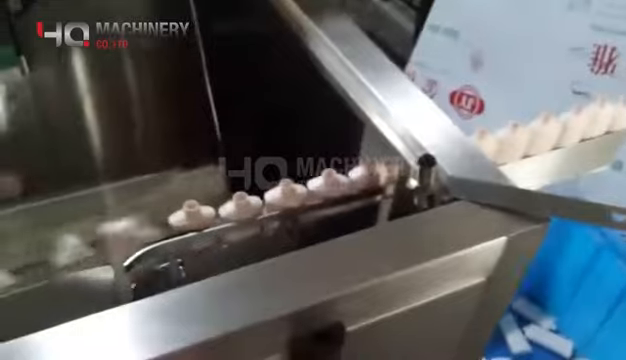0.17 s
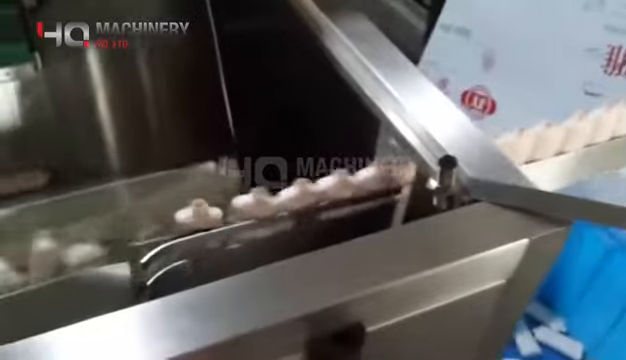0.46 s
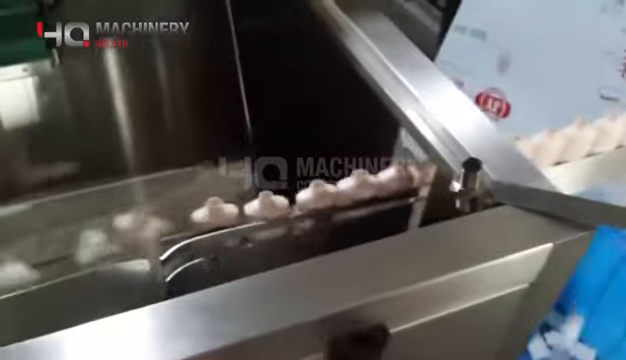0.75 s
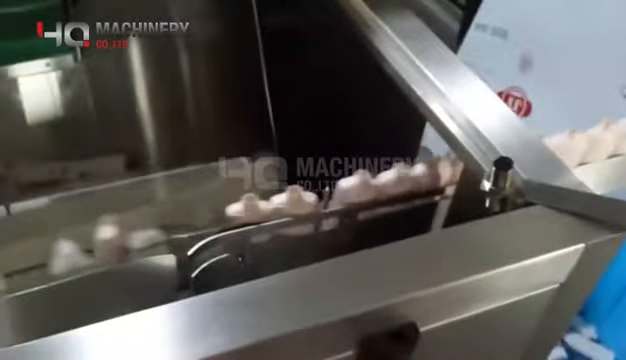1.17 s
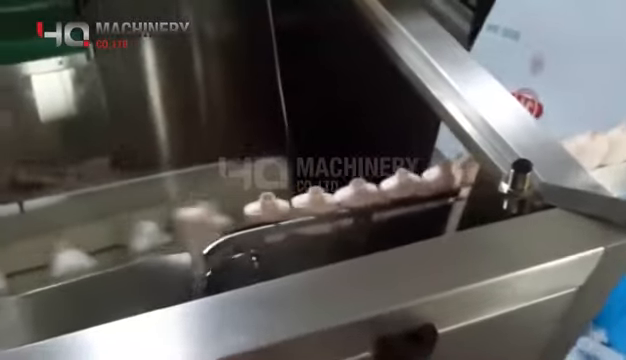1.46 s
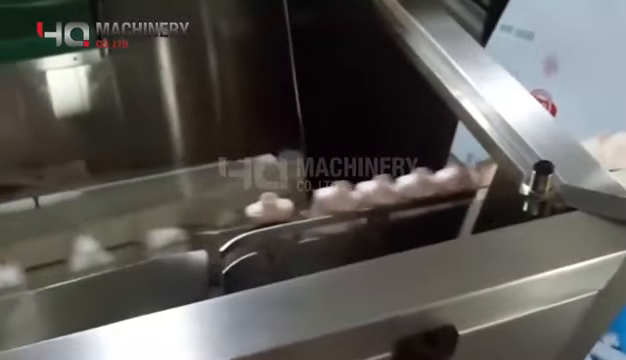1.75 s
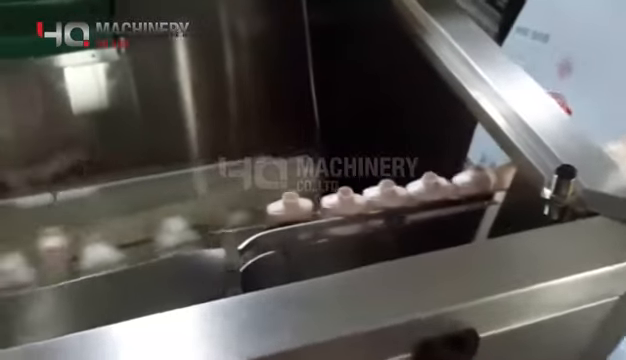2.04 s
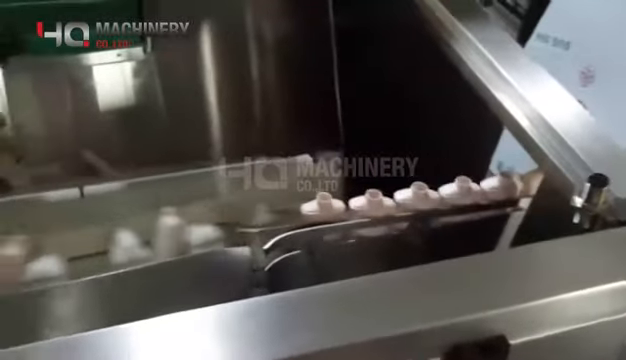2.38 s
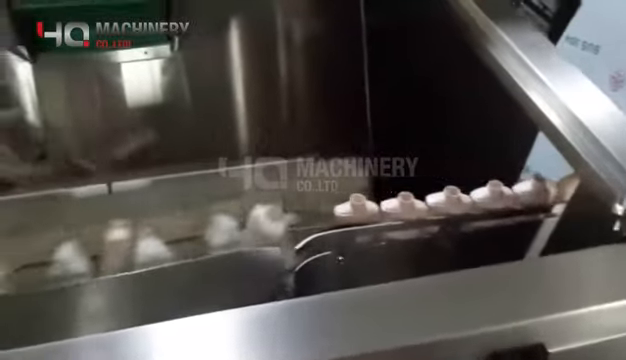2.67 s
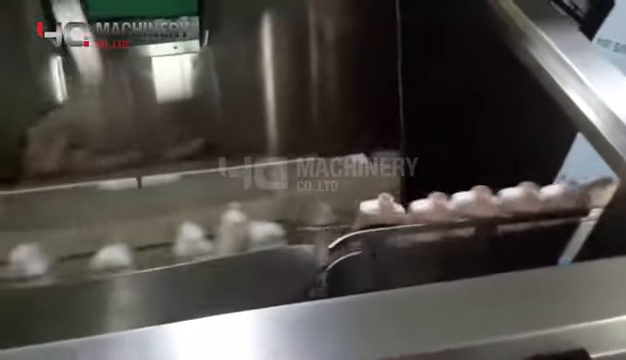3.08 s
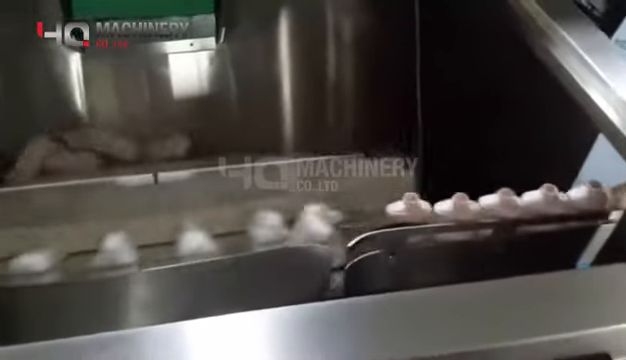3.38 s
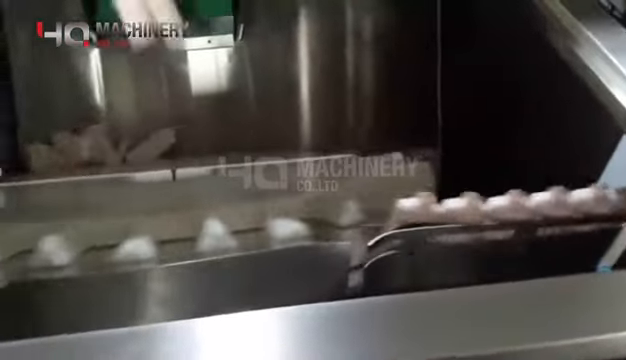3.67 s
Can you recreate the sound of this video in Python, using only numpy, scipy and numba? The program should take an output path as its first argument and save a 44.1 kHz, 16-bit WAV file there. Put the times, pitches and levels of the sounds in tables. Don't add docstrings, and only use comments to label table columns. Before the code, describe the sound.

Plastic bottles tumble and knock in a running steel sorting machine, with a constant fluttering air hiss and low rumble; the clatter grows busier in the second half. Close phone microphone in a factory hall, thin bass, dull top.

```python
import sys
import numpy as np
from scipy import signal
from scipy.fft import rfft, irfft, next_fast_len
from scipy.io import wavfile
from scipy.ndimage import uniform_filter1d
from numba import njit

SR = 44100
rng = np.random.default_rng(int(sys.argv[2]) if len(sys.argv) > 2 else 0)


def inscribe(sig):
    pcm = np.round(np.clip(np.atleast_2d(sig).T, -1, 1) * 32767)
    wavfile.write(sys.argv[1], SR, pcm.astype(np.int16))


def volts_from_decibels(level):
    exponent = np.asarray(level, float) / 20
    return 10 ** exponent


N = 168462


def level(x, db):
    return x * volts_from_decibels(db) / np.sqrt(np.mean(x ** 2))


def colour_db(table, hz):
    rows = np.array(table, float)
    return np.interp(np.log(np.maximum(hz, 1)), np.log(rows[:, 0]), rows[:, 1])


def curve_db(table):
    return np.interp(np.arange(N) / SR, *np.array(table, float).T)


def band(x, hz, width_hz):
    return signal.lfilter(*signal.iirpeak(hz, hz / width_hz, fs=SR), x)


def walk(rate_hz):
    k = int(SR / rate_hz)
    held = rng.standard_normal(400)[np.arange(N) // k % 400]
    return 1.3 * uniform_filter1d(uniform_filter1d(held, k), k)


def shaped(table, flicker_db, rate_hz, step_oct):
    size = next_fast_len(N)
    hz = np.fft.rfftfreq(size, 1 / SR)
    noise = rfft(rng.standard_normal(size)) * volts_from_decibels(colour_db(table, hz)) * (hz > table[0][0] / 2)
    out = 0
    for centre in np.arange(np.log2(table[0][0]) - 1, np.log2(table[-1][0]) + step_oct, step_oct):
        part = np.clip(1 - abs(np.log2(hz + 1) - centre) / step_oct, 0, 1)
        out = out + irfft(noise * part, size)[:N] * volts_from_decibels(flicker_db * walk(rate_hz))
    return level(out, 0)


@njit
def rings(n, at_s, hz, t60_s, size):
    out = np.zeros(n)
    for e in range(len(at_s)):
        turn = np.exp(2j * np.pi * hz[e] / SR - np.log(1000) / (t60_s[e] * SR))
        z, i = size[e] + 0j, int(at_s[e] * SR)
        for j in range(max(i, 0), min(n, i + int(t60_s[e] * SR))):
            out[j] += z.imag
            z *= turn
    return out


def bursts(t, table, rise_s, fall_s):
    env = 0
    for start, db in table:
        rise = np.clip((t - start) / rise_s, 0, 1)
        env = env + volts_from_decibels(db) * rise * np.exp(-np.maximum(t - start - rise_s, 0) / fall_s)
    return env


def chatter(t, table, low_hz, high_hz, t60_s):
    taps_per_s, rise_s, fade_s = 500, 0.0037, .016
    env = 0
    for start, length, db in table:
        rise = np.clip((t - start) / rise_s, 0, 1)
        env = env + volts_from_decibels(db) * rise * np.exp(-np.maximum(t - start - length, 0) / fade_s)
    when, pitch, strength, decay = rng.random((int(taps_per_s * N / SR), 4)).T
    hz = low_hz * (high_hz / low_hz) ** pitch
    taps = rings(N, when * N / SR, hz, t60_s * (0.29 + decay), volts_from_decibels(-1.8 * np.log(strength)))
    return env * level(taps, 0), env


def drops(table, t60_s, gain_db, spread):
    t, db, hz = np.array(table).T[:, :, None]
    g = rng.standard_normal((len(t), 3)) * np.array([0, 1, 1])
    one = np.ones_like(g)
    at_s = t + 0.00824 * abs(g)
    pitch_hz = hz * np.exp(spread * g)
    return rings(N, at_s.ravel(), pitch_hz.ravel(), t60_s * one.ravel(), (volts_from_decibels(db + gain_db) * one).ravel())


# Hz, level in dB.
JET = [(1470, -7.5), (2500, -7.5), (3630, -10), (5970, 1), (6350, 3), (6690, -2), (7280, -8.5),
       (7600, -22.5)]
# centre in seconds, half width in seconds, swell in dB.
PUFFS = [(.035, 0.028, 5), (.2, 0.012, 3), (.28, 0.11, 1.5), (.72, 0.024, 2), (.93, .02, 1.5),
         (1.034, 0.033, 4), (1.541, 0.0066, 6.5), (1.66, 0.081, 4), (1.95, 0.016, 4), (2.2, .012, -1),
         (2.33, 0.035, 4.5), (2.786, 0.0061, 4.5), (3.03, 0.12, 3), (3.24, 0.042, 2.5), (3.47, 0.016, 3.5),
         (3.71, 0.07, 3.5)]
# time in seconds, level in dB.
SPRAY = [(0, 0.5), (.25, -1), (.45, -3), (.68, -3.5), (.9, 1), (1.3, -0.5), (1.9, -0.5), (2.2, 0.5),
         (2.45, 1.5), (2.75, -0.5), (3.0, 1), (3.3, -1), (3.5, 2.5), (3.82, 2)]


def jet(t):
    jet_db, flutter_db, bands_db = -19, .6, 2.2
    swell_db = sum(db * np.exp(-((t - centre) / width) ** 2) for centre, width, db in PUFFS)
    air = shaped(JET, bands_db, 22.11, step_oct=.15)
    spray = band(air, 3600, width_hz=2600)
    air = air + (volts_from_decibels(curve_db(SPRAY)) - 1) * spray
    return volts_from_decibels(jet_db + swell_db + flutter_db * walk(24.14)) * air


# Hz, level in dB per Hz.
RATTLE = [(150, -32), (271, 3), (456, -0.5), (635, 4), (945, -8.5), (1590, -1), (2250, -2), (2900, -21.5),
          (4000, -19.5)]


def rattle(load):
    taps_per_s, ring_cycles, scatter_db, rattle_db = 1500, 9.6, 2, -4
    when, pitch, strength = rng.random((int(taps_per_s * N / SR), 3)).T
    hz = 150 * (4000 / 150) ** pitch
    db = colour_db(RATTLE, hz) + 20 * np.log10(hz) - scatter_db * np.log(strength)
    t60_s = ring_cycles / hz * np.log(1000) / 2
    taps = level(rings(N, when * N / SR, hz, t60_s, volts_from_decibels(db)), rattle_db)
    return taps * volts_from_decibels(0.61 * walk(13)) * load


# time in seconds, level in dB.
HEAP = [(0.0, -23), (0.03, -19.5), (0.13, -30.5), (0.25, -24.5), (0.63, -32), (0.97, -23), (1.33, -24.5),
        (1.35, -29), (2.25, -20.5), (2.31, -27), (2.58, -24.5), (2.78, -32), (2.93, -19), (2.96, -35),
        (3.11, -23), (3.16, -25), (3.29, -22.5), (3.82, -26)]


def heap_swell():
    rest_db = -26
    return curve_db(HEAP) - rest_db


# Hz, width in Hz, level in dB.
DRUM = [(269.8, 72, 6), (344, 97, -1), (643.4, 50, 5), (834, 93, -4)]


def drum(load, load_rest, heap_db):
    drum_db, flutter_db, floor_top_hz = -4.5, 2.6, 400
    shake = rng.standard_normal(N)
    panels = 0
    for hz, width_hz, db in DRUM:
        gain_db = db + heap_db * (hz < floor_top_hz) + flutter_db * walk(16)
        panels = panels + volts_from_decibels(gain_db) * band(band(shake, hz, width_hz), hz, width_hz)
    return level(panels, drum_db) * np.sqrt(load_rest * load)


# Hz, level in dB.
HALL = [(15, -51.5), (25, -14.5), (48, -23.5), (140, -11.5), (249, -10), (300, 1.5), (390, -36),
        (660, -120)]


def hall(load, heap_db):
    hall_db, heap_follow, flutter_db = -16.5, 0.34, 2.6
    return load * volts_from_decibels(hall_db + heap_follow * heap_db) * shaped(HALL, flutter_db, 7.8, step_oct=.5)


# start in seconds, length in seconds, level in dB.
SPILLS = [(0, 0.37, -26), (0.678, 0.073, -22.5), (0.861, 0.045, -19.5), (0.925, 0.015, -11),
          (1.026, 0.038, -17.5), (1.11, 0.19, -24), (1.57, 0.092, -31), (1.979, 0.13, -25),
          (2.212, 0.033, -19), (2.255, 0.065, -22), (2.353, 0.091, -21.5), (2.459, 0.14, -24),
          (2.809, 0.05, -19), (2.98, 0.043, -18), (3.21, 0.052, -21), (3.301, 0.074, -16),
          (3.489, 0.034, -15.5), (3.572, 0.071, -24.5), (3.695, 0.019, -18)]


def spills(t):
    return chatter(t, SPILLS, low_hz=1320, high_hz=2560, t60_s=0.0087)


# start in seconds, peak in dB, pitch in Hz.
KNOCKS = [(0.1294, -12, 1510), (0.188, -16.5, 2000), (0.2448, -17, 1830), (0.4362, -5, 1326),
          (0.5836, -6.5, 1690), (0.673, -10, 1650), (0.735, -12.5, 1720), (0.7806, -7, 1806),
          (0.815, -8, 1160), (0.8642, -2.5, 1786), (0.9296, -7, 1284), (0.9704, 1, 1527),
          (1.042, -3.5, 991), (1.1057, -5.5, 1760), (1.281, -8, 1600), (1.396, -11, 870),
          (1.4757, -11, 1975), (1.5374, -9.5, 996), (1.572, -5, 1560), (1.73, -11.5, 1260),
          (1.833, -9.5, 1100),
          (1.9406, -9, 1610), (1.9953, -3, 1654), (2.0198, -4, 2300), (2.0909, -5, 2135),
               (2.158, 1, 1977), (2.2036, -6, 1370), (2.2889, -7.5, 1610), (2.3674, -4, 1755),
               (2.506, -4.5, 1840), (2.624, -9.5, 2390), (2.705, -11, 1490), (2.7813, -1, 1454),
               (2.8136, -3.5, 1890), (2.8987, -13, 1680), (2.9799, -3.5, 1810), (3.0648, -7, 1680),
               (3.1028, -1, 2148), (3.2221, -10.5, 1350), (3.2599, -6, 1720), (3.3022, 3.5, 1590),
               (3.384, -6, 1120), (3.4439, -1, 1690), (3.5083, -4, 2130), (3.569, -4, 1700),
               (3.6428, -13, 1510), (3.7049, -5, 1816)]


def knocks():
    bounces, train_s, t60_s, spread = 11, .026, 0.036, 0.245
    knock_db, bounce_db, body_hz, body_db = -9.5, -8.5, 480, -6.5
    t, db, hz = np.array(KNOCKS).T[:, :, None]
    u = rng.random((len(t), 4, bounces))
    k = np.arange(bounces)
    first, body = k < 3, k % 4 == 3
    late = np.where(first, 0, u[:, 0] ** 1.5)
    sign = np.where(first, 1, np.sign(u[:, 3] - .5))
    size = volts_from_decibels(db + knock_db + bounce_db * ~first - 4.0 * late + body * body_db) * sign
    pitch_hz = np.where(body, body_hz, hz) * np.exp(spread * (2 * u[:, 2] - 1) * (k > 0))
    ring_s = t60_s * (.5 + u[:, 1]) * np.where(body, 2.5, 1)
    return rings(N, (t + late * train_s).ravel(), pitch_hz.ravel(), ring_s.ravel(), size.ravel())


# start in seconds, peak in dB.
SCUFFS = [(0.19, -14.5), (0.701, -16), (0.8635, -17), (0.8912, -6.5), (1.0685, -14), (1.2925, -12),
          (1.363, -16), (1.4042, -23), (1.478, -7), (1.5373, -3), (1.83, -8), (1.939, -5.5), (2.0185, -11),
          (2.203, -4.5), (2.274, -13), (2.626, -8.5), (2.7064, -28), (2.9798, -15), (3.4336, -9.5),
          (3.5684, -5), (3.708, -11.5)]


def scuffs(t):
    noise = band(rng.standard_normal(N), 3100, width_hz=2300)
    return volts_from_decibels(-6) * bursts(t, SCUFFS, rise_s=0.002, fall_s=0.016) * level(noise, 0)


# start in seconds, peak in dB, pitch in Hz.
TICKS = [(0.2774, -16, 1892), (0.371, -7, 2010), (0.94, -10, 1430), (0.9483, -11, 1921), (1.0447, -6, 1727),
         (1.0682, -8, 2242), (1.1216, -7, 1700), (1.5368, -14, 1887), (1.8352, -6, 1550),
         (2.0221, -3, 2040), (2.0924, 4, 2110), (2.1587, -1, 2000), (2.2086, -10, 2240),
         (2.2142, -8.1, 1900), (2.3688, -8, 2060), (2.3832, -7, 1744), (2.3881, -10.4, 1820),
         (2.5014, 0, 2220), (2.7831, -0.5, 1630), (2.8122, -0.5, 1950), (2.8262, 1.5, 1765),
         (2.9802, -10, 1900), (3.013, -8, 1660), (3.023, -11, 1735), (3.2615, -6.5, 1740),
         (3.2798, -9, 1720), (3.3077, -2.3, 1500), (3.3208, -4, 2030), (3.3268, -2, 1799),
         (3.3343, -10, 1729), (3.3412, -4, 1642), (3.3511, -12, 1802), (3.3607, -18, 1870),
         (3.3672, -6, 2022), (3.3941, -3, 1940), (3.417, -5, 1460), (3.4284, -6, 2030), (3.4486, -6, 1410),
         (3.5143, -10, 1970), (3.5706, -13, 2180), (3.5853, -16, 1793), (3.7187, -13, 1770)]


def ticks():
    t60_s, tick_db, neighbour_db, spread = 0.016, -3, -17, .12
    t, db, hz = np.array(TICKS).T[:, :, None]
    g = rng.standard_normal((len(t), 3)) * np.array([0, 1, 1])
    size = volts_from_decibels(db + tick_db + neighbour_db * (g != 0))
    pitch_hz = hz * np.exp(spread * g)
    return rings(N, (t + 0 * g).ravel(), pitch_hz.ravel(), t60_s + 0 * g.ravel(), size.ravel())


# start in seconds, length in seconds, level in dB.
ROLLS = [
    (0.439, 0.014, -17.5),
    (0.864, .13, -19.5),
    (1.013, 0.089, -21.5),
    (1.819, 0.012, -20.5),
    (2.224, 0.043, -19),
    (2.516, 0.028, -22.5),
    (3.382, 0.056, -27),
    (3.709, 0.047, -20),
]


def rolls(t):
    return chatter(t, ROLLS, low_hz=295, high_hz=811, t60_s=0.026)[0]


# start in seconds, peak in dB.
SLAPS = [(0.44, -4.5), (0.861, -2.5), (1.106, -6), (1.278, -6), (1.399, -1), (1.474, -12), (1.541, 2.5),
         (1.833, -1), (2.2, 1), (2.505, -2.5), (2.702, -6), (3.712, -5)]


def slaps(t):
    hz, width_hz = 1100, 2240
    noise = band(band(rng.standard_normal(N), hz, width_hz), hz, width_hz)
    return volts_from_decibels(-9) * bursts(t, SLAPS, rise_s=.005, fall_s=.009) * level(noise, 0)


# start in seconds, peak in dB, pitch in Hz.
BOOMS = [(0.86, -6, 314), (0.972, -4.5, 225.6), (1.118, -7.5, 738), (1.536, -3, 198), (1.832, -8.5, 396),
         (2.201, -9.5, 261), (2.704, -15.5, 690), (2.79, -7, 687), (3.399, -6.5, 284), (.818, -7, 285),
         (1.013, -7.5, 285), (1.173, -8, 300), (2.014, -6, 264), (2.131, -15.5, 275), (2.866, -7, 627),
         (2.898, -6.5, 288), (3.222, -8, 676), (3.528, -6.5, 300), (3.583, -6.5, 556)]


def booms():
    return drops(BOOMS, t60_s=0.059, gain_db=-7, spread=0.27)


# start in seconds, peak in dB, pitch in Hz.
THUDS = [(0.951, -28, 164), (1.4, -27, 129.5), (1.533, -16.5, 181), (1.6, -28, 110), (2.217, -18.5, 193),
         (3.226, -23.5, 142.6), (3.563, -20.5, 190), (3.621, -24, 186), (3.723, -12, 170),
         (3.752, -20, 151), (.9, -22, 148)]


def thuds():
    falls = drops(THUDS, t60_s=0.15, gain_db=0, spread=0.17)
    return band(band(falls, 130.0, 160.0), 130.0, 160.0)


def room(x):
    t60_s, room_db, gap_s = .24, -11, .004
    t = np.arange(SR) / SR
    tail = band(rng.standard_normal(SR), 900., 1600.0) * volts_from_decibels(-60 * t / t60_s) * (t > gap_s)
    return signal.fftconvolve(x, tail * volts_from_decibels(room_db) / np.sqrt(np.sum(tail ** 2)))[:N]


def scene():
    load_rest, load_follow, near_low_hz = volts_from_decibels(-18.5), 0.55, 193
    t = np.arange(N) / SR
    spill, spilling = spills(t)
    load = load_rest + load_follow * uniform_filter1d(spilling, int(0.0057 * SR))
    heap_db = heap_swell()
    hits = spill + knocks() + scuffs(t) + ticks() + rolls(t) + slaps(t) + booms()
    near = jet(t) + rattle(load) + drum(load, load_rest, heap_db) + hits + room(hits)
    near = signal.sosfilt(signal.butter(4, near_low_hz, "high", fs=SR, output="sos"), near)
    mono = near + hall(load, heap_db) + thuds()
    return np.array([mono, mono])


def top_cut(x):
    return signal.sosfilt(signal.butter(12, 8030, fs=SR, output="sos"), x)


def record(dry):
    top_hz, drive = 7540, .97
    soft = np.tanh(drive * dry) / drive
    cut = signal.sosfilt(signal.ellip(14, .3, 95, top_hz, fs=SR, output="sos"), soft)
    return top_cut(np.clip(cut, -1, 1))


dry = scene()
out = record(dry)
inscribe(out)
```